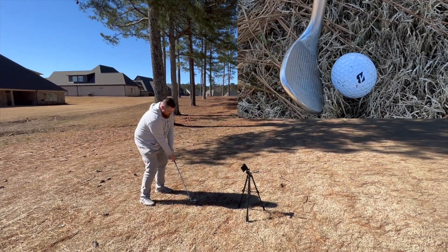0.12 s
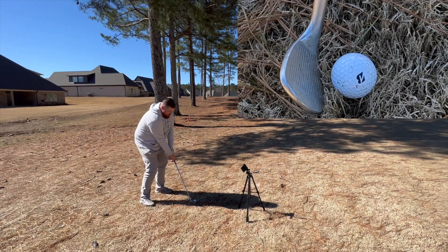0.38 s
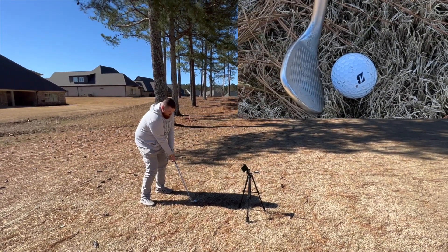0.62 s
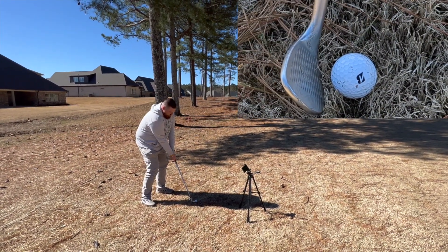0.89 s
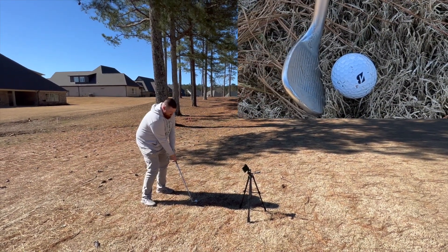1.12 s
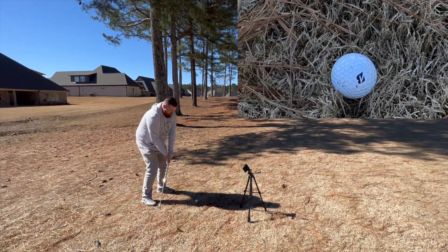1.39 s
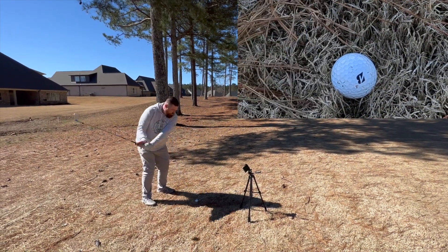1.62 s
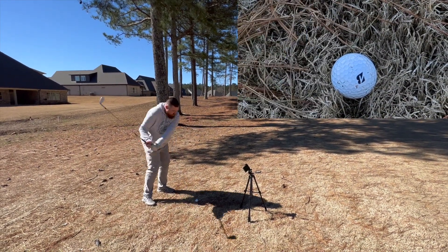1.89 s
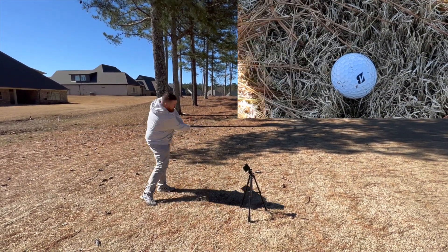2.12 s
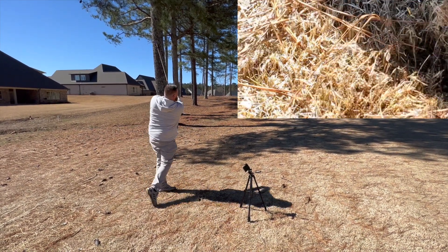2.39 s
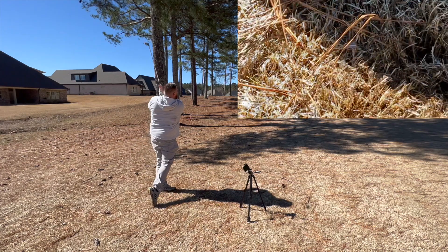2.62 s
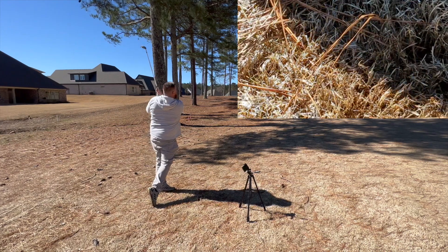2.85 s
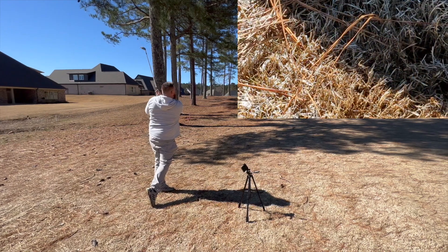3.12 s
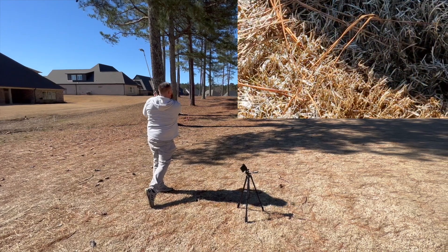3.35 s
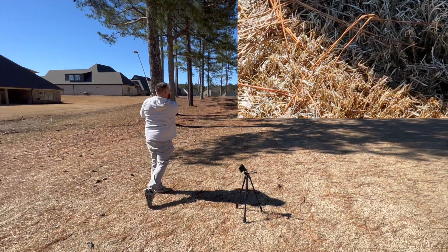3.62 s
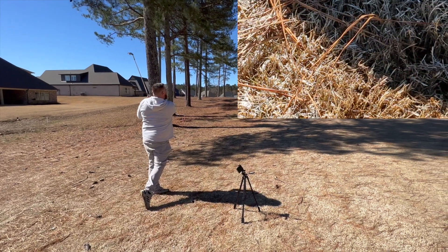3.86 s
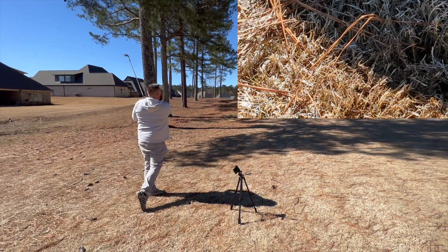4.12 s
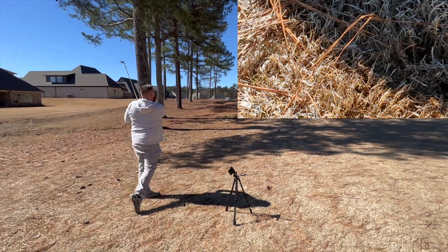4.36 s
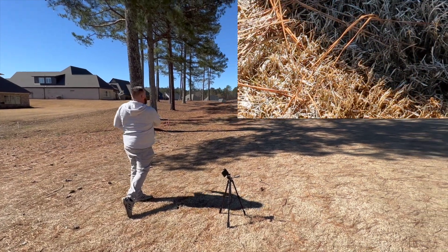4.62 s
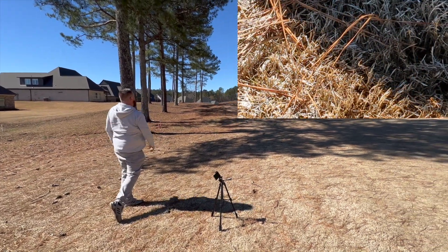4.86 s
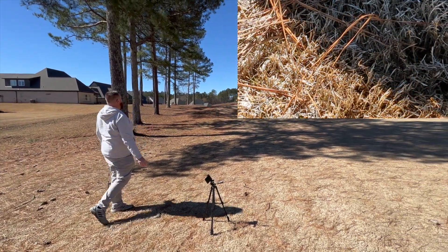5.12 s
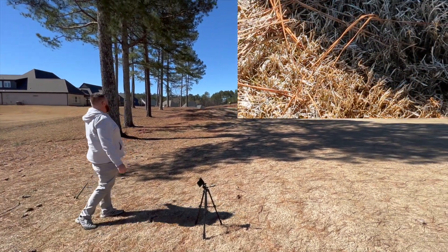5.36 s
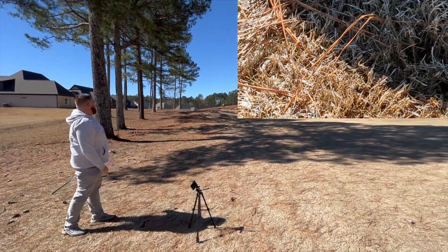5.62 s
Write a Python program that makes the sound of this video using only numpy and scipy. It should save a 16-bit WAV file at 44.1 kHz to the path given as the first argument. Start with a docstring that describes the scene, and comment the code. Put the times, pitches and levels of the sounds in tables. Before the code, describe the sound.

Close stereo microphone on open ground near trees: fast chirping trill, fan noise and low wind rumble. At two seconds a short whoosh ends in a hard metallic golf strike, doubled almost at once. Tiny bits of straw and grit crackle and settle. Near five seconds a rattling plastic-like clack, brief rustle, then two tiny taps at the end.

```python
"""An iron strikes a ball off pine straw, close to a stereo microphone: noise bursts ring modes of the club,
gliding sines make the thuds. The swish is a shedding tone plus hiss; swish and blow are heard again 0.16 s
later, from a second microphone laid over the first. Straw patters down as tiny filtered cracks, cloth and
straw rustle, a hand knocks the camera mount. A bird trills among trunks at the start, two whistles come from
far off, a cooling unit (fan noise, hum) stands to the left, wind rumbles on the ports. The loudest peaks clip."""
import sys
import numpy as np
from scipy import signal
from scipy.fft import rfft, irfft
from scipy.io import wavfile
from scipy.ndimage import uniform_filter1d

SR = 44100
rng = np.random.default_rng(int(sys.argv[2]) if len(sys.argv) > 2 else 0)


def output_pcm(signal):
    """Save a mono or channel-first signal as 16-bit PCM at the path in sys.argv[1].

    Samples are clipped to [-1, 1] before scaling.
    """
    pcm = np.clip(np.atleast_2d(signal).T, -1, 1) * 32767
    wavfile.write(sys.argv[1], SR, np.round(pcm).astype(np.int16))


def elevation(decibels):
    """Turn decibel levels (scalar or array-like) into linear amplitude ratios."""
    levels = np.asarray(decibels, float)
    return 10 ** (levels / 20)


N = 253131  # samples
T = np.arange(N) / SR  # s

# "balance" is left minus right throughout
# contacts of club, ball and ground, heard near and then from the second microphone:
# (time [s], level [dB], length [ms], tilt [dB per octave], balance [dB])
CONTACTS = [(1.957, -23.5, 5.0, 6, -15), (1.9632, -8, 2.3, 0, -3.0), (1.9658, 9, 1.7, 5.5, -6),
            (1.9668, 4.5, 4.4, 1, -12), (1.9724, -1, 4, 3.0, 3.5), (2.1211, -1, 0.28, 1.5, 1.5),
            (2.1211, 1, .7, -1.5, 1.5), (2.1223, -4.5, 5.6, -2.5, 6.5), (2.128, -16, 10, -10, 4)]
# resonances of club head and ball: (frequency [Hz], width [Hz], level [dB], balance [dB])
CLUB_MODES = [(400, 250, -7, 0), (860, 200, -9, -4), (1050, 300, 3, -1), (1650, 450, 0, 0),
              (2100, 450, 1.5, -4.5), (3600, 550, -8, 4.5), (6440, 350, -1.5, -1.5),
              (9160, 1100, -11.5, -5), (14600, 4000, -15.5, 2.5)]
# ball and club face ringing while pressed together:
# (time [s], level [dB], start pitch [Hz], end pitch [Hz], length [ms])
PRESSED = [(1.9645, -7, 930, 1120, 5.5), (1.9660, -7, 2350, 1850, 8), (1.9655, -11, 3650, 3480, 4),
           (1.9680, -14, 460, 340, 6), (2.1270, -20, 480, 380, 8)]
# thuds after the blows and under the knock, then two damped taps near the end:
# (time [s], level [dB], start pitch [Hz], end pitch [Hz], fall of pitch [ms], balance [dB])
THUDS = [(1.971, -10.5, 252, 93.5, 4.5, -1), (2.1212, -12.5, 375, 55, 2.5, 11.5),
         (2.1432, -19, 130, 62, 4, 11), (4.847, -23, 300, 60, 3, 10), (5.6106, -23, 1100, 680, 1.5, 4),
         (5.6346, -27, 1400, 800, 1.2, 4)]
# shaft cutting the air, heard near and then from the second microphone:
# (end time [s], rise [ms], end pitch [Hz], tone level [dB], balance [dB])
SWISHES = [(1.964, 29, 439, -32, -4.5), (2.118, 20, 660, -28, 3.5)]
# straw and grit landing: (time [s], level [dB], centre [Hz])
LANDINGS = [(1.79, -31, 9000), (2.0434, -26.5, 2300), (2.1445, -21, 1100), (2.1698, -22, 4000),
            (2.1948, -19, 2400), (2.2115, -26, 1500), (2.238, -18, 9500), (2.2432, -23, 1700),
            (2.2436, -21, 9000), (2.2388, -25, 4800), (2.240, -27, 1200), (2.287, -28, 5000),
            (2.348, -28, 900), (2.512, -30, 1200), (4.987, -39, 6500), (5.198, -41, 8000),
            (2.3047, -31, 5000), (2.3205, -27, 1300), (2.348, -29, 3000), (2.372, -33, 4200),
            (2.4212, -33, 2000), (2.4675, -36, 4000), (2.260, -24, 800), (2.2836, -21, 2400),
            (2.3398, -24, 9000), (2.352, -27.5, 11870), (2.383, -27, 2590), (2.3987, -26.5, 2500),
            (2.5315, -21, 2000), (2.5878, -35.5, 4500), (2.6309, -37, 3600)]
# knocks on the mount: (time [s], level [dB], tilt [dB per octave], click of the spot struck [Hz])
KNOCKS = [(4.8283, -22.5, 6, 3700), (4.835, -28, 0, 3600), (4.8378, -28, 0, 3600), (4.8403, -26, 3.5, 4200),
          (4.843, -27, 1, 3600), (4.8456, -16, 5, 4400), (4.8468, -11, 8, 4400), (4.8477, -7, 5, 3600),
          (4.8489, 2.5, 2.5, 3550), (4.8553, -2.5, 1.5, 3600), (4.861, -15, 5, 3800),
          (4.865, -16.5, -1, 3600), (4.889, -34, 12, 4300), (4.9058, -24, 2, 4250),
          (4.9076, -10, 1.5, 4250), (4.9088, -12, -3, 4250), (4.987, -32, 12.5, 3100)]
# resonances of the hollow mount, before the common knock balance:
# (frequency [Hz], width [Hz], level [dB], balance [dB])
MOUNT_MODES = [(310, 120, -6, -5), (485, 100, -8, -5), (750, 140, -5, -3), (880, 130, 1, 0),
               (1500, 300, -12, 6.5), (1780, 180, -7, 2), (2150, 300, -19, 5), (6400, 1500, -22, 0),
               (9500, 1500, -36, 0)]
# clothes and straw moving:
# (time of full level [s], level [dB], rise [s per 10 dB], hold [s], fall [s per 10 dB])
RUSTLES = [(1.327, -57, .08, .03, 0.5), (1.62, -51.5, 0.4, .3, 0.2), (2.044, -40, 0.13, .2, 0.15),
           (2.5, -59, .1, .1, 1.5), (4.84, -44, 0.03, .015, 0.1), (5.07, -46, 0.16, .05, 0.06),
           (5.15, -57, 0.24, .05, 1.5)]
# spectrum of the rustle: (frequency [Hz], relative level [dB])
RUSTLE_SPECTRUM = [(700, -11.5), (1500, 0), (3000, -8.5), (6500, -15.5), (9500, -12.5), (11000, -24.5),
                   (13000, -13), (16000, -29)]
# faint whistles far off: (time [s], length [s], start pitch [Hz], end pitch [Hz], level [dB])
WHISTLES = [(4.1, .07, 2450, 2470, -55), (4.28, .055, 2490, 2400, -54)]
# spectrum of the fan noise: (frequency [Hz], relative level [dB])
FAN_SPECTRUM = [(59, -18), (100, -2.5), (307, -17), (364, -16), (500, -26), (732, -22.5), (1860, -12),
                (2900, -33.5), (3900, -34.5), (5360, -46), (9290, -47.5), (10800, -68), (12200, -60),
                (13600, -48), (15800, -82.5)]
# balance of the fan noise over frequency: (frequency [Hz], balance [dB])
FAN_BALANCE = [(60, -4), (110, -0.5), (200, -1), (380, -4.5), (700, 2), (1290, 3.5), (2380, 12), (4400, 10),
               (8120, 3.5), (15000, -3.5)]
# hum tones of the cooling unit:
# (frequency [Hz], rms level [dB], wavering [dB], wavers [per s], balance [dB])
HUM = [(117.5, -45.5, 1.5, 16, -2), (361.2, -53.5, 1.5, 7.3, -1.5), (856, -62, 2.5, 8, 12.5),
       (1100, -62.5, -6, 6, 7.5), (1399, -62.5, 2.5, 6.6, 6.5)]

CRACK_MS = .8  # a contact this short is half bare crack, half ring
PRESSED_BALANCE_DB = -3
THUD_CYCLES = .93  # decay in cycles of the end pitch
# one value per swish: noise share of the tone; straw whistle relative to the tone
SWISH_ROUGHNESS, STRAW_DB = (.35, .6), (-14, -6)
STRAW_HZ, SHAFT_HISS_DB = 1680, 2.5  # hiss relative to the tone
SHAFT_SLOW, SHEDDING_MS = .72, 2.2  # early pitch over end pitch; smoothing of the shedding noise
LANDING_SPREAD_DB = 3.5  # greatest chance balance, either way
SHOWER_START_S, SHOWER_LENGTH_S, SHOWER_DB = 2.0, .43, -45  # level of the softest bits
KNOCK_MS, KNOCK_BALANCE_DB = .11, 12.5
# click: level relative to the knock before its tilt is added, balance before the knock balance
CLICK_WIDTH_HZ, CLICK_DB, CLICK_BALANCE_DB = 800, -23, 3.5
DEAD_HZ, DEAD_WIDTH_HZ = 2850, 900  # the mount does not speak here
RUSTLE_REST_DB = -67.5
TRILL_NOTES, TRILL_START_S, TRILL_GAP_S = 27, .0245, .04578
TRILL_DRAG_S = .0399  # extra delay of the last note
TRILL_DB, TRILL_SCATTER_DB, TRILL_EDGE_DB = -52, .8, -8
TRILL_IN_NOTES, TRILL_OUT_NOTES = 1.8, 1.1
TRILL_BALANCE_DB = 7.5, 16  # first and last note
TRUNK_ECHO_MS, TRUNK_ECHO_GAIN = 8, .5
WHISTLE_BALANCE_DB = 6
FAN_DB, FAN_LOW_DB = -41, 4.5  # level; boost of its low end
PORT_LAG = 26  # samples, sound from the left reaching the right port
WIND_DB, GUST_DB, GUSTS_PER_S = -45, 0.5, 2.5
# the low end dips near the close and creeps back
LULL_S, LULL_FALL_S, LULL_BACK_S, LULL_WIND_DB, LULL_FAN_DB = 5.1, 0.092, 0.47, -16, -6


def sides(balance_db):
    """Left and right gains."""
    return elevation(np.array([balance_db, -balance_db]) / 2)


def unit(x):
    """Scaled to rms 1."""
    return x / np.sqrt(np.mean(x ** 2))


def smooth_twice(x, k):
    """Two running means of k samples."""
    return uniform_filter1d(uniform_filter1d(x, k), k)


def band(x, hz, width):
    """One resonance, gain 1 at its centre."""
    return signal.lfilter(*signal.iirpeak(min(hz, .45 * SR), hz / width, SR), x)


def band_twice(x, hz, width):
    """The same resonance twice over, for steeper skirts."""
    return band(band(x, hz, width), hz, width)


def over_log_hz(points):
    """(frequency [Hz], value) points spread over the bins of a whole-length spectrum."""
    hz, value = np.transpose(points)
    log_hz = np.log(np.arange(N // 2 + 1) * SR / N + 1)
    return np.interp(log_hz, np.log(hz), value)


def coloured(points, channels):
    """Independent noises with a spectrum of (frequency [Hz], level [dB]) points."""
    white = rng.standard_normal((channels, N))
    return irfft(rfft(white) * elevation(over_log_hz(points)), N)


def walk(rate):
    """Random levels held 1 / rate s and slewed twice."""
    k = int(SR / rate)
    held = np.repeat(rng.standard_normal(N // k + 1), k)
    return 1.3 * smooth_twice(held, k)[:N]


def glide(hz):
    """A sine that follows a pitch track."""
    return np.sin(2 * np.pi * np.cumsum(hz) / SR)


def add(out, s, sound):
    """Mixes a short stereo sound in at time s."""
    i = int(s * SR)
    out[:, i:i + sound.shape[1]] += sound[:, :N - i]


def alike(share, size):
    """Two noises that share part of their chance."""
    a, b = rng.standard_normal((2, size))
    return np.array([a, share * a + np.sqrt(1 - min(share, 1) ** 2) * b])


def ring(push, modes, tilt_db):
    """A push rings the modes; a higher tilt favours the high ones. The channel peaks average 1."""
    y = 0
    for hz, width, db, balance in modes:
        gain = elevation(db + tilt_db * np.log2(hz / 2000)) / np.sqrt(width)
        y = y + band(push, hz, width) * (gain * sides(balance))[:, None]
    return y / np.abs(y).max(axis=1).mean()


def strike():
    """Rough contacts ring the club; the shorter the contact, the more bare crack is in it."""
    out, t = np.zeros((2, N)), T[:4096]
    for s, db, ms, tilt, balance in CONTACTS:
        crack = CRACK_MS / (CRACK_MS + ms)
        push = alike(0.48, 4096) * np.exp(-(t * 1000 / ms) ** 2) * np.minimum(t * 4000 / ms, 1)
        blow = (1 - crack) * ring(push, CLUB_MODES, tilt) + crack * push / np.abs(push).max()
        blow[1] = np.roll(blow[1], 9)  # the right port hears it a little late
        add(out, s, blow * elevation(db) * sides(balance)[:, None])
    return out


def pressed_ring():
    """Ball and face ring together while pressed: brief tones that glide under a rounded swell."""
    out, t = np.zeros((2, N)), T[:4096]
    for s, db, hz0, hz1, ms in PRESSED:
        share = np.clip(t * 1000 / ms, 0, 1)
        tone = glide(hz0 + (hz1 - hz0) * share) * np.sin(np.pi * share) ** 2
        pair = np.array([tone, np.roll(tone, 5)])  # right slightly late
        add(out, s, elevation(db) * sides(PRESSED_BALANCE_DB)[:, None] * pair)
    return out


def thuds():
    """Thuds and, near the end, two damped taps: dying tones that fall in pitch."""
    out, t = np.zeros((2, N)), T[:4096]
    for s, db, hz0, hz1, fall_ms, balance in THUDS:
        hz = hz1 + (hz0 - hz1) * np.exp(-t * 1000 / fall_ms)
        thud = glide(hz) * np.exp(-t * hz1 / THUD_CYCLES)
        add(out, s, np.outer(sides(balance), elevation(db) * thud))
    return out


def swish():
    """Vortices leave the shaft at a rate that rises with its speed; a hiss grows steeply on top."""
    out, k = np.zeros((2, N)), int(SHEDDING_MS * SR / 1000)
    t = T[:8192] - T[8192]  # time up to the end of the swish
    for (s, ms, hz, db, balance), rough, straw_db in zip(SWISHES, SWISH_ROUGHNESS, STRAW_DB):
        speed = np.exp(t * 1000 / ms)
        gate = 1 / (1 + (t * 1000 / (2.595 * ms)) ** 8)
        # each channel wavers on its own, partly shared, track
        in_phase, quadrature = [unit(smooth_twice(alike(.7, 8192), k)) * rough for _ in range(2)]
        turn = 2 * np.pi * np.cumsum(hz * (SHAFT_SLOW + (1 - SHAFT_SLOW) * speed)) / SR
        tone = unit((1 - rough + in_phase) * np.sin(turn) + quadrature * np.cos(turn))
        tone = tone * gate * (.5 + .6 * speed)
        straw = elevation(straw_db) * unit(band_twice(alike(.5, 8192), STRAW_HZ, 600)) * gate
        noise = alike(0.13, 8192)
        hiss = unit(band(noise, 1300, 1600) + 0.057 * band(noise, 9600, 2500)) * speed
        mix = tone + straw + elevation(SHAFT_HISS_DB) * hiss
        add(out, s + t[0], elevation(db) * mix * sides(balance)[:, None])
    return out


def patter():
    """Straw lands as tiny broad cracks; 220 softer ones shower down after the first blow, around the second."""
    out, t = np.zeros((2, N)), T[:512]
    chance = rng.random((220, 3))
    times = SHOWER_START_S + SHOWER_LENGTH_S * chance[:, 0]
    levels = SHOWER_DB + 9 * chance[:, 1] ** 2
    centres = 1500 * 6 ** chance[:, 2]
    for s, db, hz in np.r_[np.array(LANDINGS), np.c_[times, levels, centres]]:
        crack = band_twice(alike(.4, 512) * np.exp(-t / .0011), hz, 1.4 * hz)
        gains = elevation(db) * sides(LANDING_SPREAD_DB * rng.uniform(-1, 1))
        add(out, s, crack / np.abs(crack).max() * gains[:, None])
    return out


def knocks():
    """Short pushes into the hollow mount with a little rattle; the far port hears them late."""
    out, t = np.zeros((2, N)), T[:2048] * 1000 / KNOCK_MS
    for s, db, tilt, click_hz in KNOCKS:
        rattle = .12 * alike(.8, 2048) * t * np.exp(-t / 5.0) / 5.0
        push = t ** 2 * np.exp(-t) * (1 - t / 3) + rattle
        body = ring(band(push, 1500, 2400), MOUNT_MODES, tilt)
        body = body - band(body, DEAD_HZ, DEAD_WIDTH_HZ)
        click = band_twice(push, click_hz, CLICK_WIDTH_HZ)
        click = click / np.abs(click).max() * elevation(CLICK_DB + tilt) * sides(CLICK_BALANCE_DB)[:, None]
        y = (body + click) * elevation(db) * sides(KNOCK_BALANCE_DB)[:, None]
        add(out, s, np.array([y[0], np.roll(y[1], 18)]))
    return out


def rustle():
    """A fine-grained hiss while the body turns and straw slides; each movement rises, holds and fades."""
    grain = elevation(1.5 * walk(150))
    power = elevation(RUSTLE_REST_DB) ** 2
    for s, db, rise, hold, fall in RUSTLES:
        before, after = np.maximum(s - T, 0), np.maximum(T - s - hold, 0)
        power = power + elevation(db - 10 * before / rise - 10 * after / fall) ** 2
    return unit(coloured(RUSTLE_SPECTRUM, channels=2)) * grain * np.sqrt(power)


def bird():
    """Notes sweep up and hook over, slowing and drifting left; a near trunk echoes, far trunks smear."""
    out, t = np.zeros((2, N)), T[:820]
    hz = 4400 + 1220 * np.sin(np.pi / 2 * t / .0135)
    onset = .45 * np.exp(-((t - .0022) / .0018) ** 2)
    top = .45 * np.exp(-((t - .0125) / .0038) ** 2)
    shape = (onset + .28 + top) * np.sin(np.pi * t / t[-1]) ** .5
    for n in range(TRILL_NOTES):
        share, left = n / (TRILL_NOTES - 1), TRILL_NOTES - 1 - n
        s = TRILL_START_S + TRILL_GAP_S * n + TRILL_DRAG_S * share ** 3
        # the trill swells in and dies away
        edge = np.exp(-n / TRILL_IN_NOTES) + np.exp(-left / TRILL_OUT_NOTES)
        db = TRILL_DB + TRILL_EDGE_DB * edge - 4 * (left == 0) + TRILL_SCATTER_DB * rng.standard_normal()
        balance = np.interp(share, [0, 1], TRILL_BALANCE_DB)
        note = glide(hz * (1 + 0.003 * rng.standard_normal()))
        add(out, s, np.outer(sides(balance), elevation(db) * note * shape))
    smear = alike(.2, 6000) * np.exp(-T[:6000] / .026)
    flutter = elevation(2.5 * walk(300))
    echo = np.roll(band(out, 5600, 500), int(TRUNK_ECHO_MS * SR / 1000), axis=1)  # mostly the note tops
    out = out + TRUNK_ECHO_GAIN * echo
    return out * flutter + elevation(-29.5) * signal.fftconvolve(out, smear, axes=1)[:, :N]


def far_bird():
    """Faint, nearly level whistles far off: gliding sines under a rounded swell."""
    out = np.zeros((2, N))
    for s, length, hz0, hz1, db in WHISTLES:
        share = T[:int(length * SR)] / length
        note = glide(hz0 + (hz1 - hz0) * share) * np.sin(np.pi * share) ** .5
        add(out, s, np.outer(sides(WHISTLE_BALANCE_DB), elevation(db) * note))
    return out


def lull():
    """Depth 0-1 of the dip in the low end."""
    t = T - LULL_S
    return np.clip(t / LULL_FALL_S, 0, 1) * np.exp(-np.maximum(t - LULL_FALL_S, 0) / LULL_BACK_S)


def cooling_unit():
    """Fan noise and wavering hum from the left: the right port hears them late, the fan partly unrelated."""
    common, own = unit(coloured(FAN_SPECTRUM, channels=2))
    fan = np.array([common, 0.33 * np.roll(common, PORT_LAG) + 0.74 * own])
    fan = irfft(rfft(fan) * sides(over_log_hz(FAN_BALANCE)), N)
    low = signal.sosfilt(signal.butter(2, 1000, fs=SR, output="sos"), fan)
    low_gain = elevation(FAN_LOW_DB + LULL_FAN_DB * lull())
    out = unit(fan + low * (low_gain - 1)) * elevation(FAN_DB + .8 * walk(6.71))
    for hz, db, waver_db, rate, balance in HUM:
        tone = unit(elevation(waver_db * walk(rate)) * np.sin(2 * np.pi * hz * T + 1.18 * walk(rate)))
        out = out + elevation(db) * sides(balance)[:, None] * np.array([tone, np.roll(tone, PORT_LAG)])
    return out


def wind():
    """Gusts rumble on each port alone: low noise, unrelated left and right, with a wandering level."""
    spectrum = [(15, -23), (28, -8), (50, 9.0), (80, 10.5), (130, -18.5), (250, -12), (500, -52.5)]  # Hz, dB
    gust_db = WIND_DB + GUST_DB * walk(GUSTS_PER_S) + LULL_WIND_DB * lull()
    port_db = 1.5 * np.array([walk(6), walk(6)])
    return unit(coloured(spectrum, channels=2)) * elevation(gust_db + port_db)


def scene():
    """Hits with a brief scatter from trunks and ground, over the other sounds of the place."""
    hits = strike() + pressed_ring() + thuds() + patter()
    t = T[:9000]
    scatter = alike(.2, 9000) * np.exp(-t / 0.035) * (t > .006)
    wet = signal.fftconvolve(hits, band(scatter, 1500, 4000), axes=1)[:, :N]
    near = hits + elevation(-46.5) * wet + swish() + knocks() + rustle()
    return near + bird() + far_bird() + cooling_unit() + wind()


def low_pass(x):
    """Removes everything above the highest recorded frequency."""
    return signal.sosfilt(signal.butter(12, 15930, fs=SR, output="sos"), x)


def record(dry):
    """The microphone dulls the very top and the loudest peaks clip flat."""
    mic = signal.sosfilt(signal.butter(4, 14500, fs=SR, output="sos"), dry)
    return low_pass(np.clip(mic, -.98, .98))


dry = scene()
out = record(dry)
output_pcm(out)
```